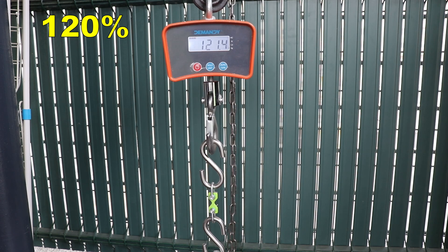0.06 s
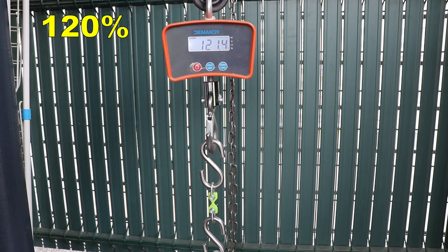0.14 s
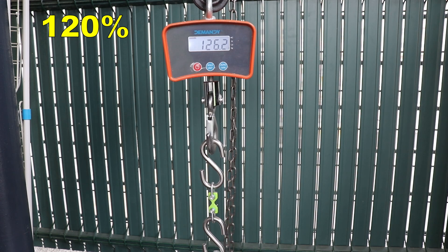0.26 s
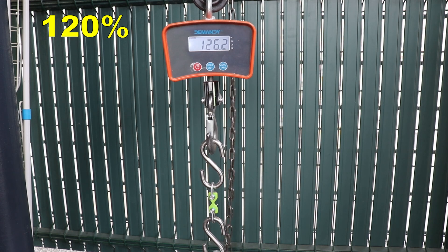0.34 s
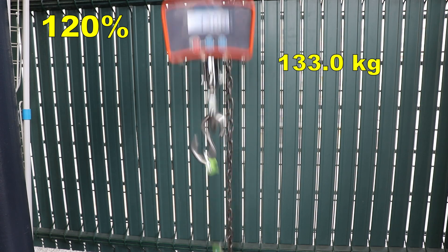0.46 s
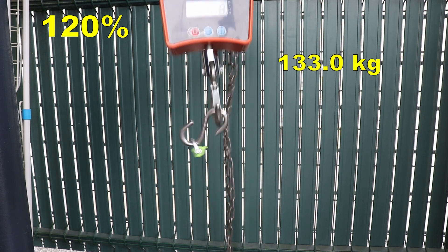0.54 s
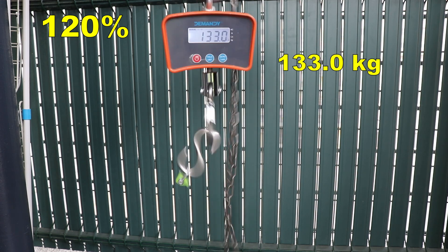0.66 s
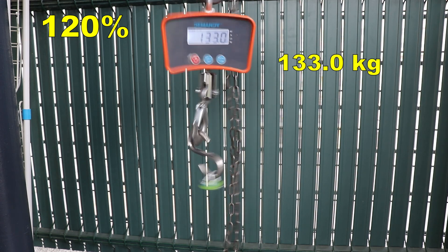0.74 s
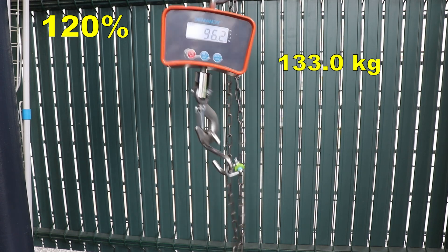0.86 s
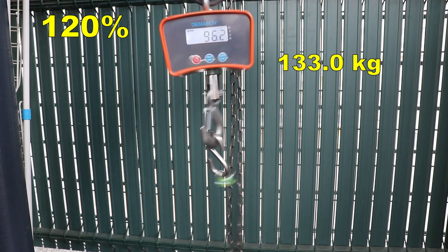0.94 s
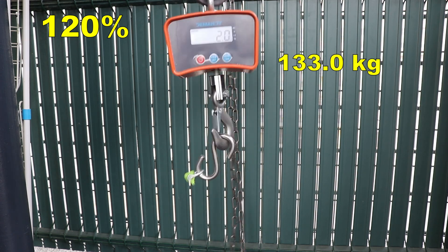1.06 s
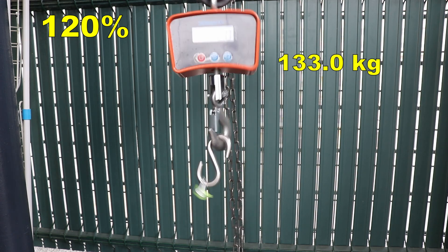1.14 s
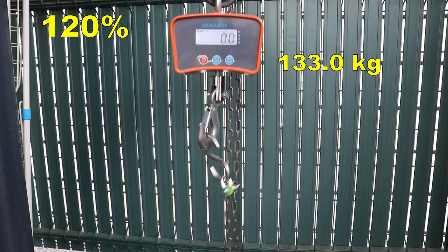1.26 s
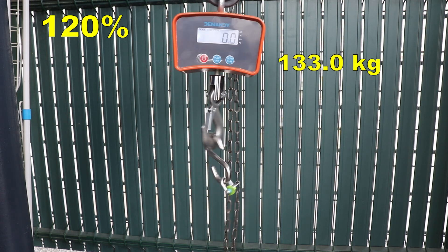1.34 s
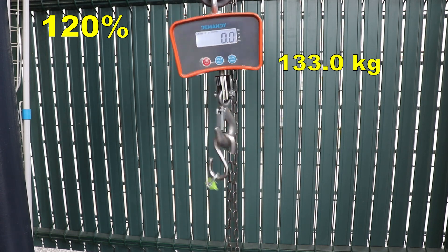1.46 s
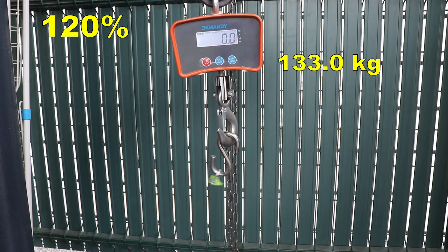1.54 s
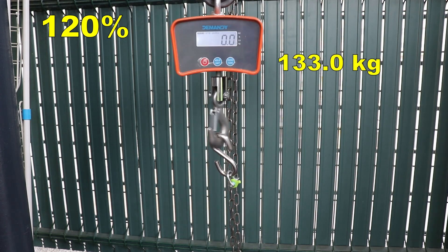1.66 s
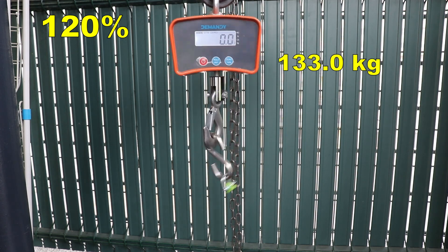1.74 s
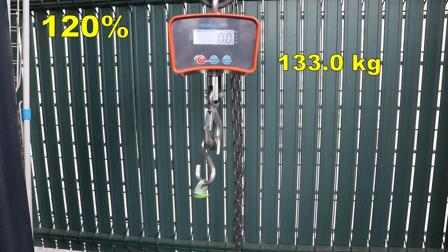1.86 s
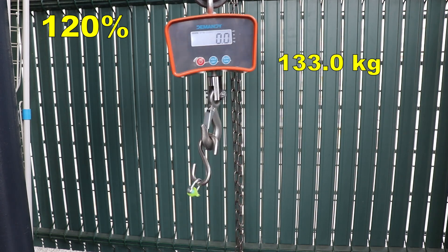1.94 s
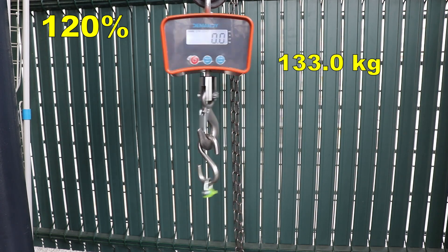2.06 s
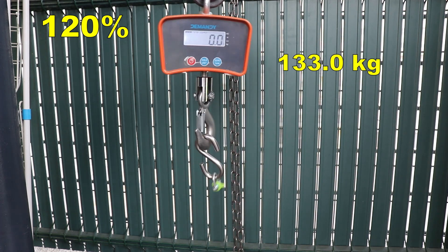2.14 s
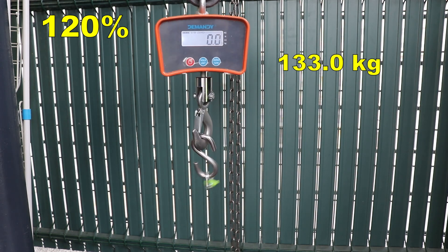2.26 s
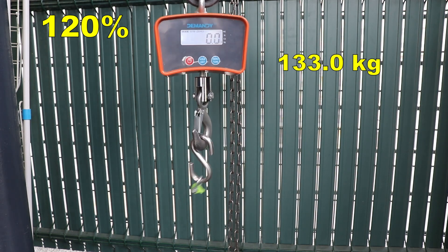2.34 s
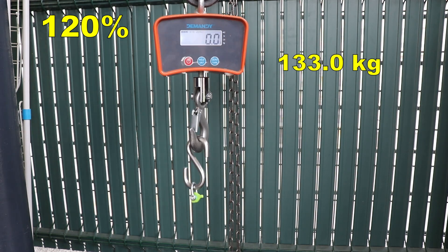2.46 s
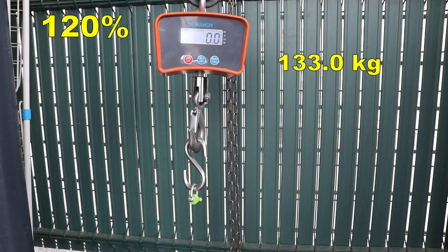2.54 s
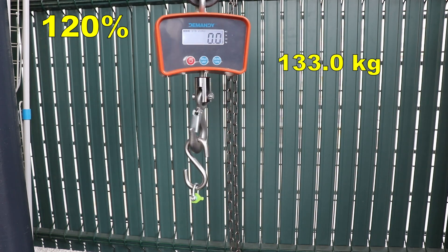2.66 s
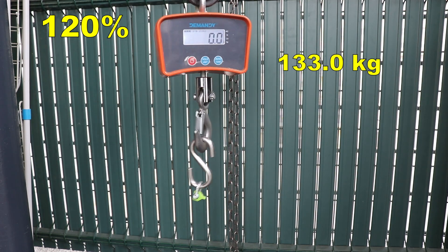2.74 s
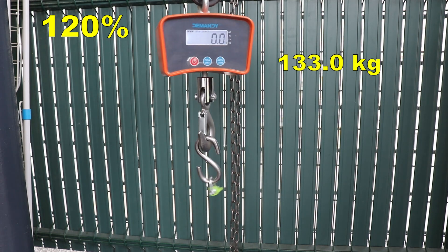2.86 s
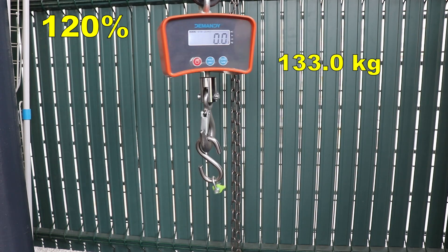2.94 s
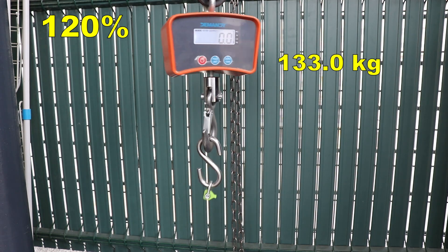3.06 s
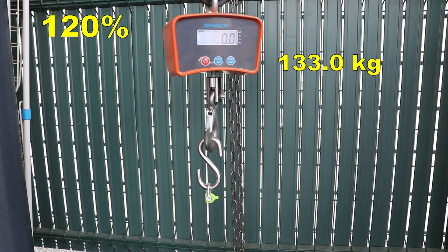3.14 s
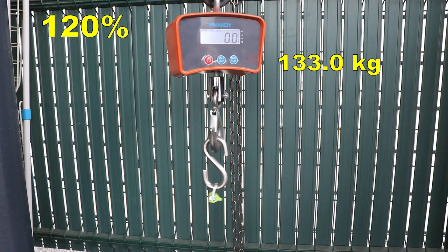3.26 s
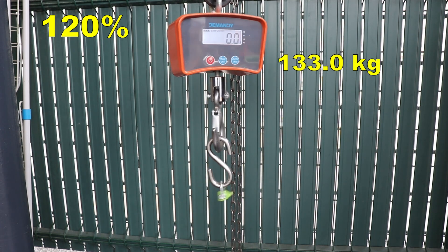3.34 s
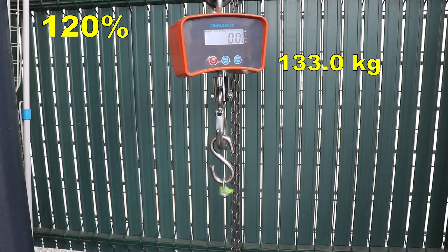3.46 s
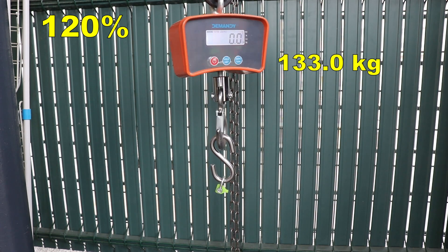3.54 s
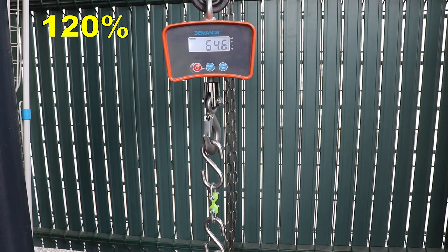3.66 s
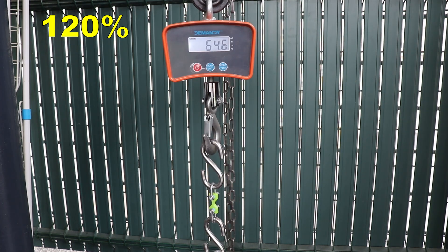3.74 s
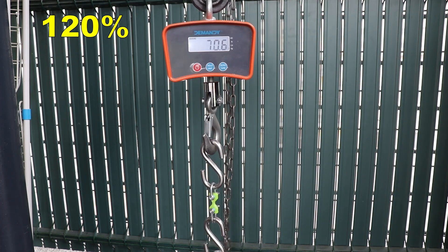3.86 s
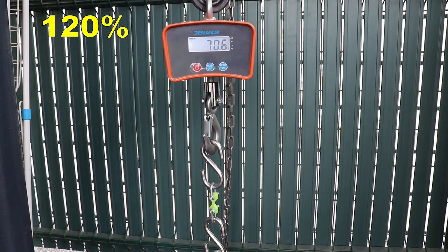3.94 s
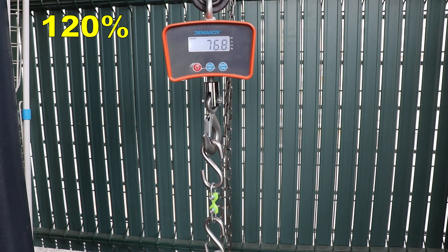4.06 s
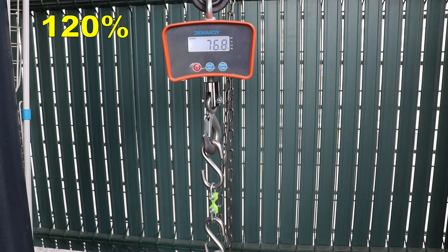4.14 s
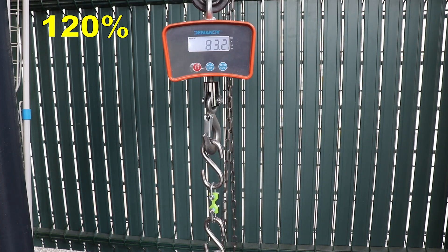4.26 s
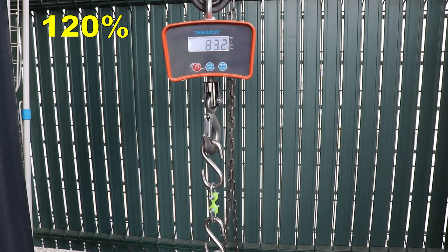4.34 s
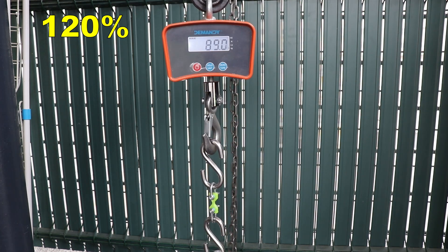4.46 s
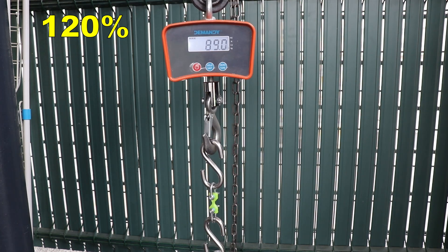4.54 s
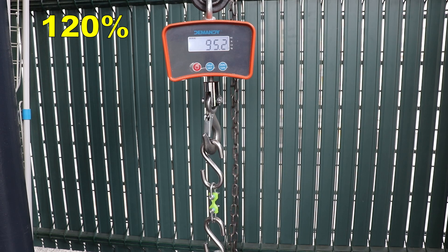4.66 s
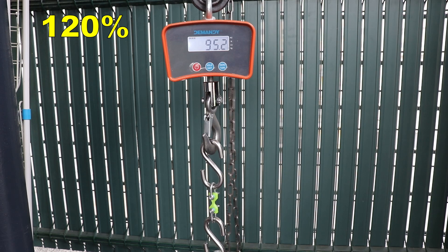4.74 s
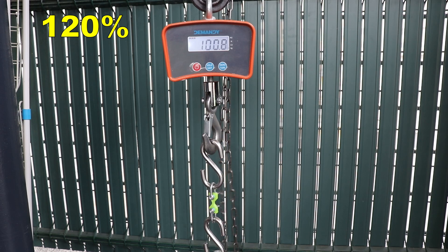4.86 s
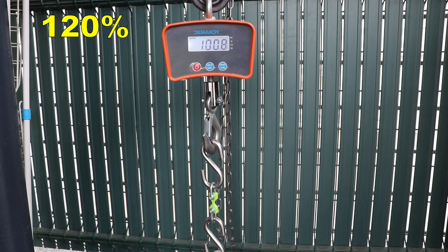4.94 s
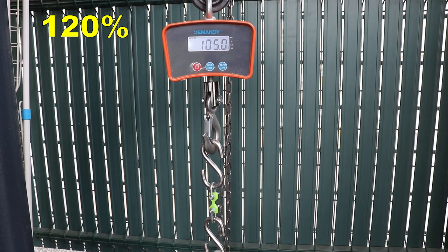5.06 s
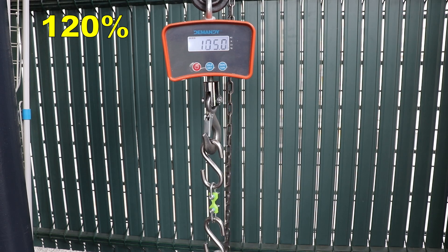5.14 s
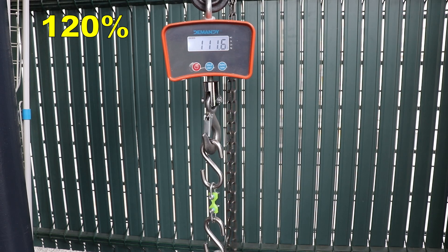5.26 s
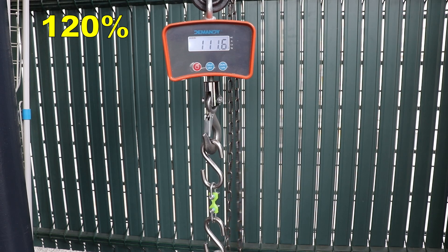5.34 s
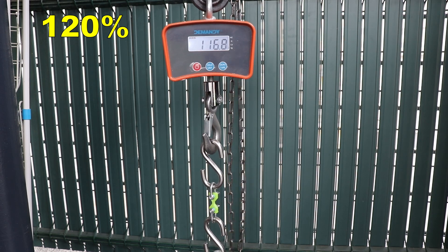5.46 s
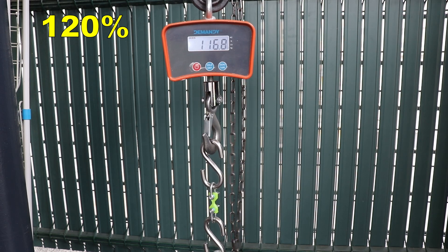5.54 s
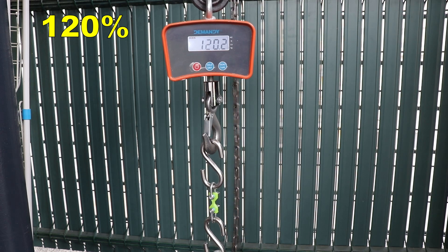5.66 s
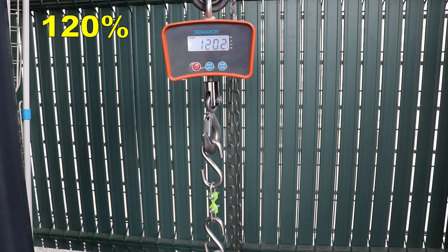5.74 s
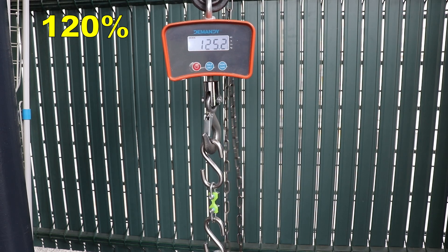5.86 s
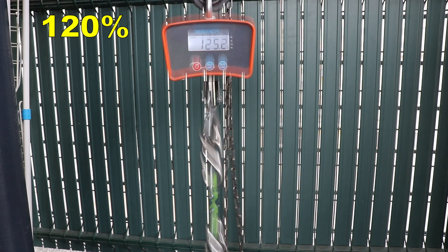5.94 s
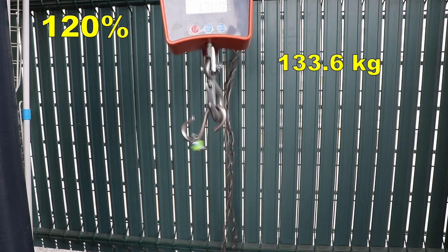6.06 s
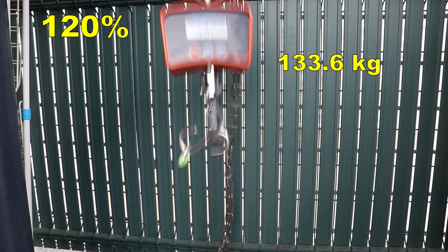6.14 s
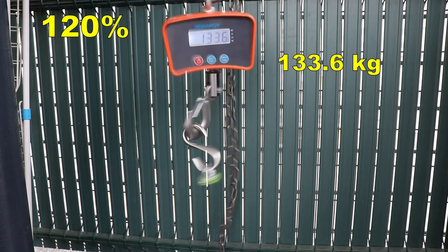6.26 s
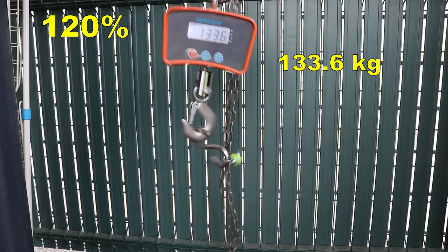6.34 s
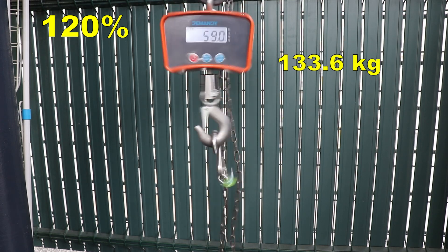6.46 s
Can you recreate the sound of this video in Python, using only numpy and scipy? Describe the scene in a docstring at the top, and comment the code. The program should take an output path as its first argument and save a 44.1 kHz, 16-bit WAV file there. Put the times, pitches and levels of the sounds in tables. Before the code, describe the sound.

Loud plastic crack and clattering steel hooks and chain, fading to faint swinging ticks, then ratchet clicks and creaking links before another crashing break.

```python
"""A ratchet chain hoist pulls on a plastic test piece hung by steel hooks from a crane scale in a workshop.
Pawl clicks and slipping links are filtered noise bursts with dying sines, until the piece snaps; this happens
twice. Each snap is a crack of noise and a shower of chain clinks; the hooks ring in long tumbling modes, the
scale knocks and hums, and after the first the swinging shackle clinks and rubs. Air, rumble and a whine lie
below. Loud peaks clip at the microphone input, and a slow gain control eases the level down."""
import sys
import numpy as np
from scipy import signal
from scipy.fft import rfft, irfft
from scipy.io import wavfile

SR = 44100
rng = np.random.default_rng(int(sys.argv[2]) if len(sys.argv) > 2 else 0)


def digitize_waveform(pressure):
    """Quantize a signal to 16-bit integers and store it at the path in sys.argv[1].

    Rows of a 2-D input are taken as channels; values are limited to [-1, 1].
    """
    field = np.atleast_2d(pressure).T
    bounded = np.clip(field, -1, 1)
    quanta = np.round(bounded * 32767).astype(np.int16)
    wavfile.write(sys.argv[1], SR, quanta)


N = 286650
T = np.arange(SR) / SR  # seconds since a blow

# Still workshop air, spectrum: frequency_hz, level_db (per Hz)
AIR_COLOUR = [(12, -22.5), (20, -6.5), (63, -21.5), (262, -22.5), (328, -26), (542, -24), (678, -22.5),
              (1860, -31.5), (2020, -35), (3340, -50.5), (4810, -48), (9950, -56), (16000, -51)]
# Grinding gear of the hoist, spectrum: frequency_hz, level_db (per Hz)
GRINDING_COLOUR = [(35, -41.5), (60, -6.5), (184, 1), (566, -10.5), (732, -13), (2090, -25), (2350, -21),
                   (3940, -29), (5210, -28), (7060, -32), (10800, -38.5), (16000, -38)]
# Low rumble over time: time_s, level_db
RUMBLE_LEVEL = [(0, -70.5), (1.9, -73.5), (2.45, -53), (2.8, -56.5), (3.05, -52), (3.8, -69), (6.5, -69.5)]
# Faint whine over time: time_s, level_db
WHINE_LEVEL = [(0, -66), (.5, -72), (.6, -87.5), (6.5, -85)]
# The hoist is wound: start_s, end_s, grinding_db
WINDS = [(0, .52, -68), (3.609, 6.058, -57)]
# The pawl drops onto a tooth: start_s, level_db
PAWL_CLICKS = [(0.2362, -23.5), (.243, -35), (3.6982, -20.5), (4.028, -22), (4.392, -22), (4.838, -23),
               (5.3326, -22), (5.793, -22)]
# Pawl click, spectrum: frequency_hz, level_db (per Hz)
PAWL_COLOUR = [(180, -19.5), (300, -22), (900, -10), (1170, -15), (2320, -7), (2880, -7.5), (3240, -6),
               (3700, -13), (5430, -1), (7820, -5), (8940, 2), (9710, -4.5), (12300, 0.5), (14000, -11),
               (16000, -6.5)]
# Chain links slip or creak under the load, some faintly: start_s, level_db, pitch_hz (most excited)
LINK_SLIPS = [(.015, -43.5, 1900), (.346, -48.5, 2760), (.435, -47, 2160), (3.6505, -37, 2490),
              (3.667, -42, 2800), (3.737, -35, 5400), (3.7755, -35.5, 3100), (3.9692, -47, 5400),
              (4.1945, -39, 2400), (4.512, -44.5, 664), (4.7748, -34, 5360), (4.802, -36.5, 5400),
              (5.0506, -45, 2500), (5.071, -57, 2500), (5.254, -40, 2400), (5.6954, -39.5, 5530),
              (5.713, -39.5, 5360), (5.789, -38.5, 2200), (5.8617, -36, 5210)]
# Scrape of a link, spectrum: frequency_hz, level_db (per Hz)
LINK_COLOUR = [(200, -4.5), (700, 3.5), (1300, -2.5), (2500, -2.5), (3600, -5.5), (5400, -3.5),
               (7500, -8.5), (11000, -15), (16000, -20)]
# Ringing of a chain link before detuning: pitch_hz, level_db, t60_s
LINK_MODES = [(660, -16, .15), (900, -17, .1), (2350, -9, .15), (2750, -11, .13), (3300, -15, .09),
              (4200, -15, .16), (5250, -8, .13), (5560, -11, .14), (6300, -15, .1)]
# Thin, very high pings of the strained chain: start_s, level_db
CHAIN_PINGS = [(0.419, -35), (3.651, -26), (4.765, -34), (5.05, -34.5), (5.322, -26), (5.695, -24.5),
               (5.881, -25.5)]
# The piece breaks: start_s, crack_db, thrash_db (chain), thrash_t60_s
SNAPS = [(0.5244, -4.5, -22, 0.99), (6.0491, -5.5, -29.5, 1)]
# Cracks and clashing steel, spectrum: frequency_hz, level_db (per Hz)
CLASH_COLOUR = [(40, -18), (120, -1.5), (300, -10), (700, -6), (1500, -8.5), (4000, -3), (8000, -1.5),
                (12000, -8.5), (16000, -2)]
# Single blows on the hooks, hard and soft: start_s, ring_db, pitch_hz (most excited), clash_db (contact)
HOOK_BLOWS = [(.524, -12, 8070, -5.5), (.545, -10.5, 14050, -13), (.565, -11, 8200, -36),
              (.632, -1, 11160, -9.5), (.655, -12.5, 7900, -21), (.612, -20, 6730, -26.5),
              (.715, -23, 4540, -8), (.757, -22.5, 6430, -15), (1.019, -25, 3600, -39),
              (1.039, -31.5, 4445, -54.5), (1.109, -36, 5490, -42.5), (1.178, -52.5, 6750, -33),
              (6.048, -3, 7940, -5), (6.069, -8.5, 12800, -33.5), (6.082, -7.5, 3950, -9),
              (6.114, -10.5, 10200, -8), (6.128, -4, 3980, -14), (6.152, -8, 14400, -5),
              (6.204, -17.5, 6530, -17), (6.241, -19.5, 8500, 0.5), (6.344, -13, 4720, -27),
              (6.364, -21, 11200, -13.5), (6.409, -28, 8400, -17.5), (6.462, -26.5, 7400, -10)]
# Ringing of the hooks: pitch_hz, level_db, t60_s
HOOK_MODES = [(463, -21, .8), (1070, -15, .3), (1418, -12, .5), (1589, -16, .4), (2090, -9, .2),
              (2454, -11, .45), (3665, -4, .85), (4445, -3, .55), (5250, -12, .3), (5555, -9, .3),
              (6606, -12, .35), (6752, -1, .55), (7438, -4, .25), (8396, 0, .4), (8984, -9, .4),
              (10226, -6, .5), (10283, -10, .5), (12685, -2, .45), (13256, -8, .3), (14928, -4, .27),
              (15603, -11, .5)]
# Humming body of the scale: pitch_hz, level_db, t60_s
SCALE_MODES = [(152, 0, .27), (183, 2, .35), (291, -4, .9), (463, 2, .5), (748, -5, .35)]
# The scale's housing knocks against its shackle: start_s, level_db, pitch_hz, clatter_db (relative to the tone)
KNOCKS = [(.527, -9.5, 2060, -10), (0.8428, -13.5, 1366, 4.5), (0.849, -2, 2476, -3.5),
          (0.8777, -24.5, 2050, 9), (0.886, -10.5, 3510, -1.5), (0.9476, -9, 2524, -6.5),
          (0.9954, -16.5, 1850, 1), (1.0107, -10.5, 1600, -3.5), (1.0212, -11.5, 2454, -14),
          (1.0372, -19, 1910, 2.5), (1.06, -35, 1965, 9), (1.0864, -24, 1456, 2.5),
          (1.1084, -30.5, 1860, 10.5), (1.1304, -21.5, 1644, -2), (1.651, -46, 2000, 1.5),
          (6.0519, -14.5, 1790, 9.5), (6.2673, -1.5, 1573, 0.5), (6.336, -14.5, 2900, -26),
          (6.3458, -5, 2448, -2), (6.436, -9.5, 1814, 8), (6.463, -9, 1860, 3.5)]
# The shackle clinks as the hook swings out:
# start_s, level_db, pitch_hz (most excited), t60_s (extra damping by the contact), hum_db (in the scale)
CLINKS = [(1.2791, -40, 6600, 0.026, -78), (1.3353, -17.5, 12300, 0.99, -43.5),
          (1.3377, -18, 6900, 0.53, -48), (1.414, -30, 8400, 0.04, -67), (1.428, -20, 9400, 0.024, -47.5),
          (1.4388, -16.5, 3300, 0.11, -40), (1.527, -43.5, 7500, 0.069, -73.5)]
# Ringing of the shackle before contact damping: pitch_hz, level_db, t60_s
SHACKLE_MODES = [(748, -22, .3), (1486, -23, .25), (3327, -13, .09), (4856, -13, .12), (6605, -1, .24),
                 (6751, -7, .13), (7564, -14, .2), (8414, -7, .28), (9200, -9, .08), (9572, -10, .09),
                 (12300, -6, .32), (13070, -12, .07)]
# Clearest ticks of the swinging hook in its eye: start_s, level_db
EYE_TICKS = [(1.8273, -46), (1.877, -52), (1.9779, -50), (2.0062, -44), (2.2742, -47), (2.308, -45),
             (2.6475, -61), (2.7574, -56.5), (3.0704, -64.5), (3.172, -62.5), (3.494, -57.5)]
# Ringing of the eye: pitch_hz, level_db, t60_s
EYE_MODES = [(2070, -11, .11), (2700, -12, .06), (4880, -7, .07), (7600, -11, .06), (8420, -11, .07),
             (9400, -12, .05)]
# Decay of the reflections: frequency_hz, t60_s
ROOM_DECAY = [(100, 0.34), (500, .32), (2000, 0.22), (6000, 0.17), (15000, 0.091)]
# More spectra: frequency_hz, level_db (per Hz)
RUMBLE_COLOUR = [(10, -8), (28, 0), (60, -4), (100, -12), (200, -40), (1000, -90)]
WHINE_COLOUR = [(2000, -69.5), (3000, -22.0), (3100, -0.5), (3200, -24.5), (4500, -72.5)]
PING_COLOUR = [(9000, -31.0), (14700, -33), (15400, -6), (15900, -8), (16500, -6.5)]
HOUSING_COLOUR = [(40, -16.5), (130, -9.5), (300, -24.5), (750, -16.0), (1200, 2.5), (2600, 3),
                  (4000, -6.5), (8000, -15), (16000, -35)]
CLINK_COLOUR = [(100, -10), (600, -8.0), (2000, -1.5), (5000, 2.5), (9000, 3.5), (13000, -17), (16000, 5.5)]
DRY_STEEL_COLOUR = [(200, -1), (1200, -2.5), (2300, 1.5), (5000, -1.0), (8500, -4), (10500, -18.5), (15500, -14.5)]

RAMP_S = .06  # onset and end of winding and swinging
THUMP_DB, THUMP_T60_S = -52, 1.6  # low jolt of a snap
# A slipping link: a scrape, then its ring; links differ a little in pitch (detune is a fraction)
LINK_SCRAPE_DB, LINK_SCRAPE_T60_S, LINK_RING_DB, LINK_DETUNE = -2, .04, 4, .02
# The chain creaks as it tightens, at most this long before each pawl drop
CREAK_LEAD_S, CREAK_DB, CREAK_HZ = 0.07, -58, 5400
# The chain settles softly at random during the last wind
SETTLE_DB, SETTLE_SPREAD_DB, SETTLE_LOW_HZ, SETTLE_HIGH_HZ = -57, 7, 2320, 6000
# Faint pings while the chain swings widely
SWING_PING_DB, SWING_PING_SPREAD_DB, WIDE_SWING_END_S = -45, 5, 2.85
CLASH_RISE_S = 0.004
# After a snap the hooks go on jostling, ever more softly
JOSTLE_S, JOSTLE_RING_DB, JOSTLE_CLASH_DB, JOSTLE_FALL_DB_PER_S = .66, -14, -17, 40
JOSTLE_LOW_HZ, JOSTLE_HIGH_HZ = 3836, 11150
# Each knock bounces once, softer and mostly as clatter
KNOCK_T60_S, BOUNCE_S, BOUNCE_DB, BOUNCE_CLATTER_DB = 0.032, .02, -22.5, 5
# The freed rig swings: the hook rubs and ticks in its eye, and the frame shudders, all dying away
SWING_START_S, SWING_END_S, SWING_FALL_DB_PER_S = 1.15, 3.6, 10
RUB_DB, SMALL_TICK_DB, SMALL_TICK_SPREAD_DB = -59, -47.5, 1
SHUDDER_DB, SHUDDER_FALL_DB_PER_S = -49.5, 17.5
INPUT_CEILING, GAIN_SMOOTHING_S, BAND_LIMIT_HZ = .2, .6, 15900


def amp(db):
    """Decibels to gain."""
    return 10 ** (np.asarray(db) / 20)


def unit(x):
    """Scales to an rms of one."""
    return x / np.sqrt(np.mean(x ** 2) + 1e-20)


def read(points, hz):
    """Reads a table along a log-frequency axis."""
    f, value = np.transpose(points)
    return np.interp(np.log(hz + 1), np.log(f + 1), value)


def level(curve):
    """Gain at every sample from rows of (time_s, level_db)."""
    return amp(np.interp(np.arange(N) / SR, *np.transpose(curve)))


def add(mix, s, sound):
    """Mixes a sound in at time s."""
    part = mix[max(round(s * SR), 0):][:len(sound)]
    part += sound[:len(part)]


def fade(t60):
    """Exponential decay after a blow, falling 60 dB in t60 seconds."""
    return np.exp(-np.log(1000) * T / t60)


def noise(colour, size=SR):
    """Random noise shaped to a given spectrum, at an rms of one."""
    hz = np.fft.rfftfreq(size, 1 / SR)
    spectrum = rfft(rng.standard_normal(size)) * amp(read(colour, hz))
    return unit(irfft(spectrum, size))


def ring(modes, scatter_db, favour=lambda hz: 0):
    """Dying sines; each blow lands elsewhere and shares its energy out differently."""
    chance = rng.uniform(-1.9, 1, (len(modes), 2))
    out = np.zeros(SR)
    for (hz, db, t60), (strength, phase) in zip(modes, chance):
        gain = amp(db + favour(hz) + scatter_db * strength)
        out += gain * fade(t60) * np.sin(2 * np.pi * hz * T + np.pi * phase)
    return out


def favoured(hz, centre_hz, depth_db, octaves):
    """Gain in dB of a frequency: the place of contact excites the modes around one pitch most."""
    distance = np.log2((hz + 1) / centre_hz) / octaves
    return -depth_db * np.tanh(distance ** 2)


def during(start, end, fall_db_per_s=0):
    """Gain that ramps up at start, sinks steadily, and ramps down at end."""
    t = np.arange(N) / SR
    gate = np.clip(np.minimum(t - start, end - t) / RAMP_S + .5, 0, 1)
    return gate * amp(-fall_db_per_s * np.maximum(t - start, 0))


def scattered(start, end, count):
    """Irregular moments through a span: rows of (s, chance of strength -1 to 1, chance of pitch 0 to 1)."""
    slip, strength, pitch = rng.random((count, 3)).T
    moments = start + (end - start) * (np.arange(count) + slip) / count
    return zip(moments, 2 * strength - 1, pitch)


def background():
    """Noise beds: still air, low rumble with a jolt per snap, faint whine, and soft grinding and shudder."""
    bass = level(RUMBLE_LEVEL)
    for s, _, _, _ in SNAPS:
        add(bass, s, amp(THUMP_DB) * fade(THUMP_T60_S))
    air = amp(-60) * noise(AIR_COLOUR, size=N)
    rumble = bass * noise(RUMBLE_COLOUR, size=N)
    whine = level(WHINE_LEVEL) * noise(WHINE_COLOUR, size=N)
    grinding = sum(amp(db) * during(start, end) for start, end, db in WINDS)
    shudder = amp(SHUDDER_DB) * during(SWING_START_S, SWING_END_S, SHUDDER_FALL_DB_PER_S)
    return air + rumble + whine + (grinding + shudder) * noise(GRINDING_COLOUR, size=N)


def link_slips():
    """The single slips, a creak before each pawl click, and soft settling through the last wind."""
    start, end, _ = WINDS[-1]
    slips = list(LINK_SLIPS)
    for s, _ in PAWL_CLICKS:
        slips.append((s - CREAK_LEAD_S * rng.random(), CREAK_DB, CREAK_HZ))
    for s, strength, pitch in scattered(start, end, count=18):
        pitch_hz = SETTLE_LOW_HZ * (SETTLE_HIGH_HZ / SETTLE_LOW_HZ) ** pitch
        slips.append((s, SETTLE_DB + SETTLE_SPREAD_DB * strength, pitch_hz))
    return slips


def chain_link(centre_hz):
    """Friction scrapes a link, and its slightly detuned modes ring, strongest around one pitch."""
    def favour(hz):
        return favoured(hz, centre_hz, depth_db=8.0, octaves=0.24)

    colour = [(hz, db + favour(hz)) for hz, db in LINK_COLOUR]
    scrape = noise(colour) * (fade(LINK_SCRAPE_T60_S) + amp(-6.5) * fade(.14))
    own_modes = [(hz * (1 + LINK_DETUNE * rng.uniform(-1, 1)), db, t60) for hz, db, t60 in LINK_MODES]
    modes = ring(own_modes, scatter_db=3, favour=favour)
    onset = 1 - fade(0.0074)
    return (amp(LINK_SCRAPE_DB) * scrape + amp(LINK_RING_DB) * modes) * onset


def hoist():
    """Dry pawl clicks as noise bursts, with the ringing ticks and fine pings of the chain."""
    out = np.zeros(N)
    for s, db in PAWL_CLICKS:
        decay = fade(0.046) + amp(-15.5) * fade(.17)
        add(out, s, amp(db) * noise(PAWL_COLOUR) * decay * (1 - fade(0.012)))
    for s, db, centre_hz in link_slips():
        add(out, s, amp(db) * chain_link(centre_hz))
    pings = list(CHAIN_PINGS)
    for s, strength, _ in scattered(SWING_START_S, WIDE_SWING_END_S, count=6):
        pings.append((s, SWING_PING_DB + SWING_PING_SPREAD_DB * strength))
    for s, db in pings:
        add(out, s, amp(db) * noise(PING_COLOUR) * fade(.14) * (1 - fade(.012)))
    return out


def snaps():
    """The plastic cracks, and the freed chain thrashes in a dying shower of collisions, each with its own pitch."""
    out = np.zeros(N)
    for s, crack_db, thrash_db, t60 in SNAPS:
        shower = np.zeros(SR)
        rasp = noise(CLASH_COLOUR)
        for when, pitch, size, length in rng.random(size=(170, 4)):
            clink = np.sin(2 * np.pi * 750 * 9 ** pitch * T) * fade(.03 + .14 * length)  # from 750 to 6750 Hz
            scratch = np.roll(rasp, int(when * SR)) * fade(.03)  # another stretch of the rasp each time
            add(shower, when, amp(12 * size - 8) * (clink + scratch))
        crack = amp(crack_db) * rasp * fade(0.041)
        thrash = amp(thrash_db) * (unit(shower) + amp(-17) * noise(CLASH_COLOUR)) * fade(t60)
        add(out, s, crack + thrash)
    return out


def hook_blows():
    """The single blows and the fading jostle after each snap, in order of time."""
    blows = list(HOOK_BLOWS)
    for s, _, _, _ in SNAPS:
        for delay, _, pitch in scattered(0, JOSTLE_S, count=10):
            fall_db = JOSTLE_FALL_DB_PER_S * delay
            pitch_hz = JOSTLE_LOW_HZ * (JOSTLE_HIGH_HZ / JOSTLE_LOW_HZ) ** pitch
            blows.append((s + delay, JOSTLE_RING_DB - fall_db, pitch_hz, JOSTLE_CLASH_DB - fall_db))
    return sorted(blows)


def hooks():
    """Steel on steel: a short clash, then long modes that swell and dip as the hooks tumble."""
    out, t, blows = np.zeros(N), np.arange(N) / SR, hook_blows()
    steps = np.linspace(0, N / SR, 420)
    steady, tumble = .45, 1.15
    for hz, db, t60 in HOOK_MODES:
        energy, decay = np.zeros(N), fade(t60) ** 2
        for s, ring_db, centre_hz, _ in blows:
            # each contact damps what is still ringing
            energy[round(s * SR):][:SR] *= .62
            blow_db = db + ring_db + favoured(hz, centre_hz, depth_db=21, octaves=0.2)
            add(energy, s, amp(blow_db) ** 2 * decay)
        # slow random gains on two phases make the mode swell and dip
        in_phase = np.interp(t, steps, rng.standard_normal(len(steps)))
        across = np.interp(t, steps, rng.standard_normal(len(steps)))
        sine = (steady + tumble * in_phase) * np.sin(2 * np.pi * hz * t)
        cosine = tumble * across * np.cos(2 * np.pi * hz * t)
        out += np.sqrt(energy) * (sine + cosine)
    for s, _, _, clash_db in blows:
        add(out, s, amp(clash_db) * noise(CLASH_COLOUR) * fade(0.054) * (1 - fade(CLASH_RISE_S)))
    return out


def scale_hum():
    """Blows on the shackle and each snap set the heavy scale humming in low dying modes."""
    out = np.zeros(N)
    for s, _, _, _, hum_db in CLINKS:
        add(out, s, amp(hum_db) * ring(SCALE_MODES, scatter_db=0.5) * (1 - fade(0.099)))
    for s, _, _, _ in SNAPS:
        hum = ring(SCALE_MODES, scatter_db=-3, favour=lambda hz: favoured(hz, 400, depth_db=18.5, octaves=0.48))
        add(out, s, amp(-35.5) * hum)
    return out


def housing():
    """Hollow knocks that bounce once: one damped resonance among noisy clatter with a dull thud."""
    out = np.zeros(N)
    bounces = []
    for s, db, hz, _ in KNOCKS:
        delay = BOUNCE_S * (.5 + rng.random())
        bounces.append((s + delay, db + BOUNCE_DB, hz, BOUNCE_CLATTER_DB))
    for s, db, hz, clatter_db in list(KNOCKS) + bounces:
        tone = fade(KNOCK_T60_S) * np.sin(2 * np.pi * hz * T)
        clatter = amp(clatter_db) * noise(HOUSING_COLOUR) * (fade(KNOCK_T60_S) + amp(-27.5) * fade(0.038))
        add(out, s, amp(db) * (tone + clatter))
    return out


def shackle():
    """Bright clinks of damped modes and noise, then rubbing and small ticks that grow faint as the swing dies."""
    swing = during(SWING_START_S, SWING_END_S, SWING_FALL_DB_PER_S)
    out = amp(RUB_DB) * swing * noise(DRY_STEEL_COLOUR, size=N)
    for s, db, centre_hz, t60, _ in CLINKS:
        modes = ring(SHACKLE_MODES, scatter_db=2, favour=lambda hz: favoured(hz, centre_hz, depth_db=7, octaves=0.19))
        contact = noise(CLINK_COLOUR) * (amp(2.5) * fade(0.042) + amp(-13.5) * fade(0.14))
        add(out, s, amp(db) * (modes * fade(t60) + contact))
    ticks = list(EYE_TICKS)
    for s, strength, _ in scattered(SWING_START_S, SWING_END_S, count=18):
        fall_db = SWING_FALL_DB_PER_S * (s - SWING_START_S)
        ticks.append((s, SMALL_TICK_DB + SMALL_TICK_SPREAD_DB * strength - fall_db))
    for s, db in ticks:
        contact = noise(DRY_STEEL_COLOUR) * fade(.03)
        add(out, s, amp(db) * (amp(2) * ring(EYE_MODES, scatter_db=6) + contact))
    return out


def room(x):
    """Sparse random reflections that die faster in the treble."""
    taps = rng.standard_normal(SR) * (rng.random(SR) < 4000 / SR) * (T > .005)  # about 4000 a second
    hz, t, bands = signal.stft(taps, SR, nperseg=256)
    decay = np.exp(-np.log(1000) * t / read(ROOM_DECAY, hz)[:, None])
    tail = signal.istft(bands * decay, SR, nperseg=256)[1]
    return signal.fftconvolve(x, tail / np.linalg.norm(tail))[:N]


def scene():
    """The rig and its reflections over the background."""
    rig = hoist() + snaps() + scale_hum() + housing() + shackle()
    steel = hooks()
    reflections = room(amp(-11.5) * rig + amp(-8.5) * steel)
    return (rig + steel + reflections + background())[None]


def record(dry):
    """The microphone input clips hard, a slow gain control eases the level down, then the band limit."""
    # clipping at twice the sample rate keeps aliasing down
    clipped = np.clip(signal.resample_poly(dry, 2, 1, axis=1), -INPUT_CEILING, INPUT_CEILING)
    clipped = signal.resample_poly(clipped, 1, 2, axis=1)
    hold = np.exp(-1 / (GAIN_SMOOTHING_S * SR))
    overload = signal.lfilter([1 - hold], [1, -hold], (clipped / INPUT_CEILING) ** 2)
    eased = clipped * amp(-8 * overload)
    low_pass = signal.firwin(255, BAND_LIMIT_HZ, window=("kaiser", 9), fs=SR)
    return signal.oaconvolve(eased, low_pass[None], "same")


dry = scene()
out = record(dry)
digitize_waveform(out)
```